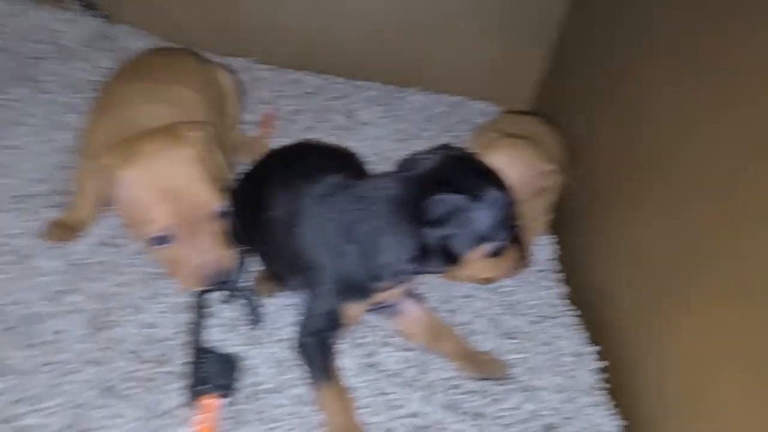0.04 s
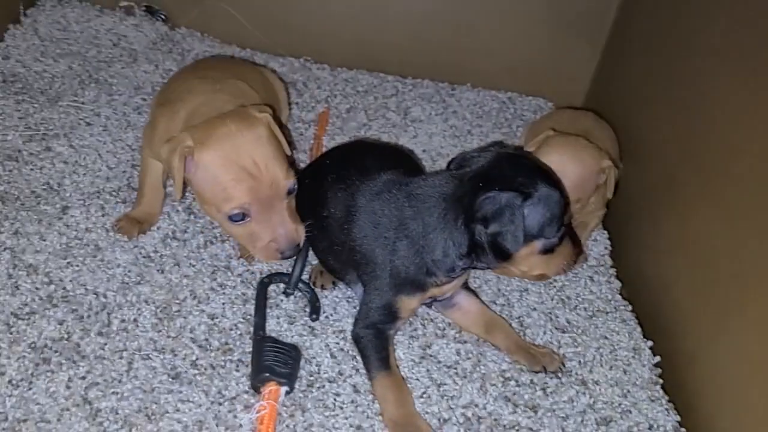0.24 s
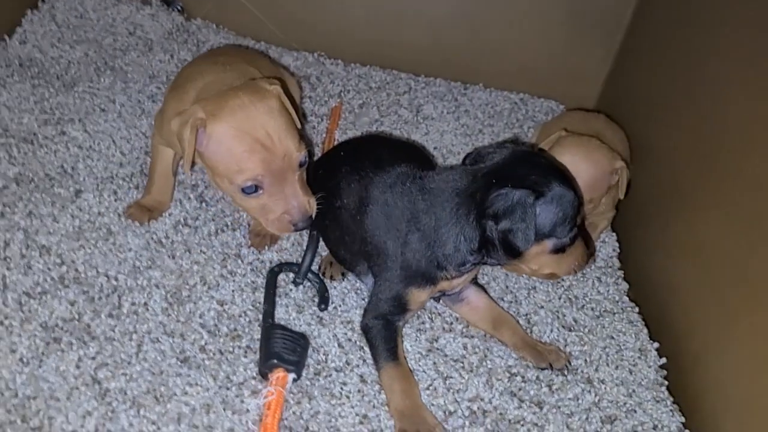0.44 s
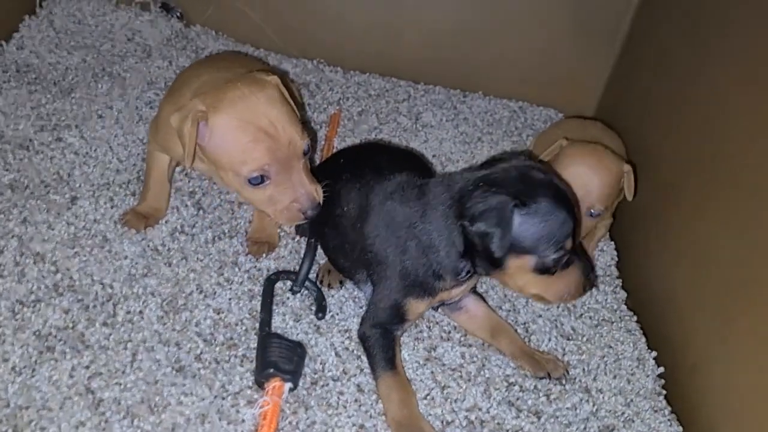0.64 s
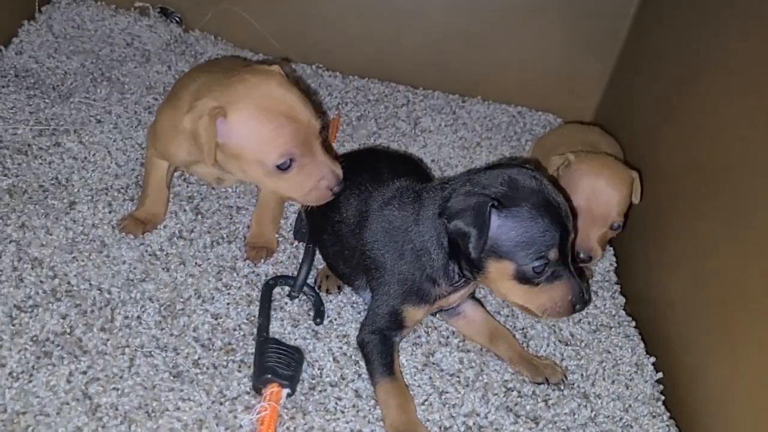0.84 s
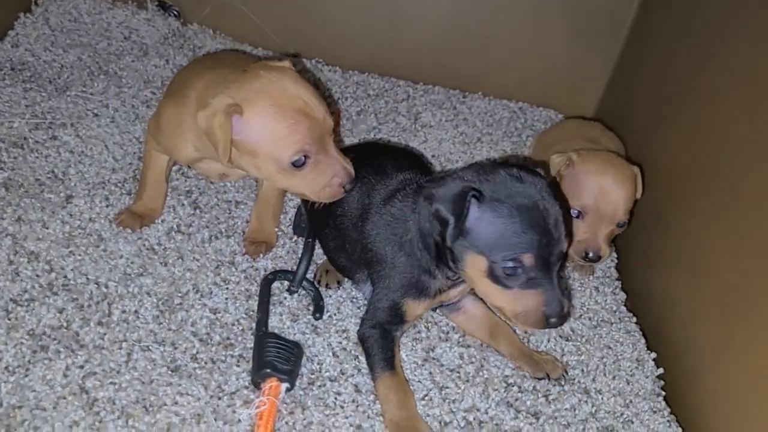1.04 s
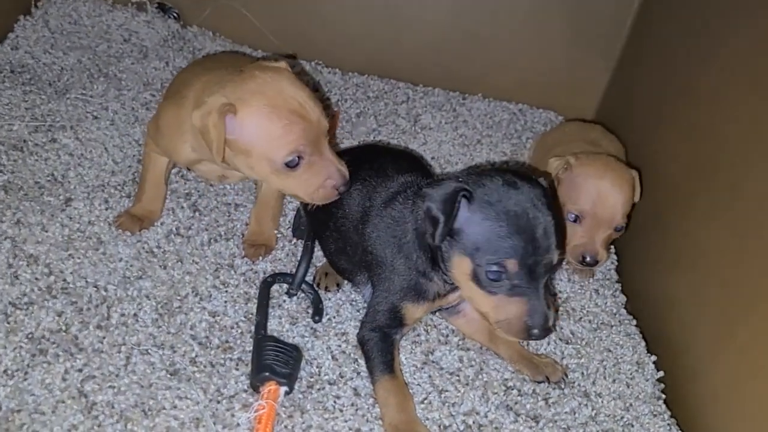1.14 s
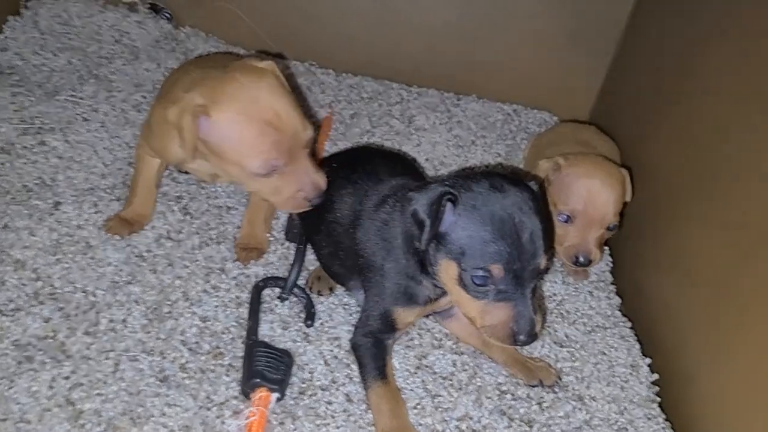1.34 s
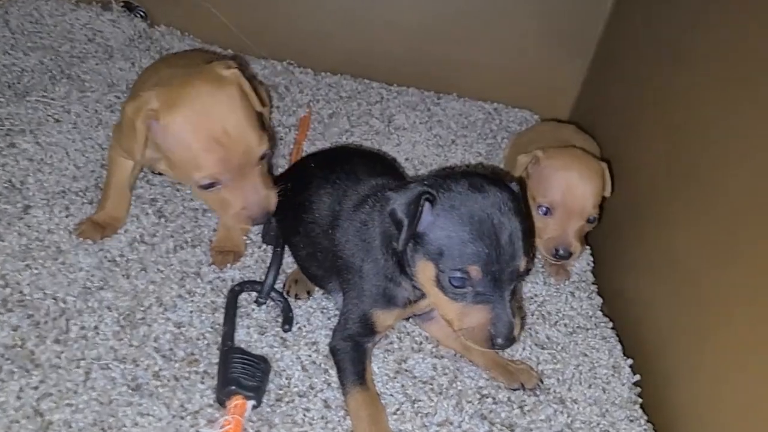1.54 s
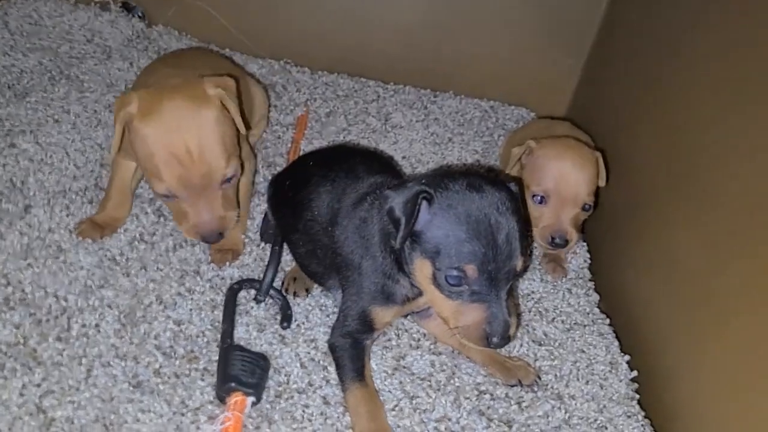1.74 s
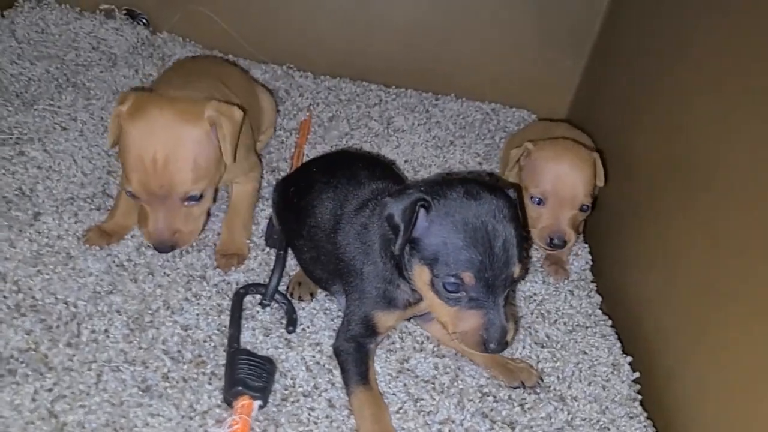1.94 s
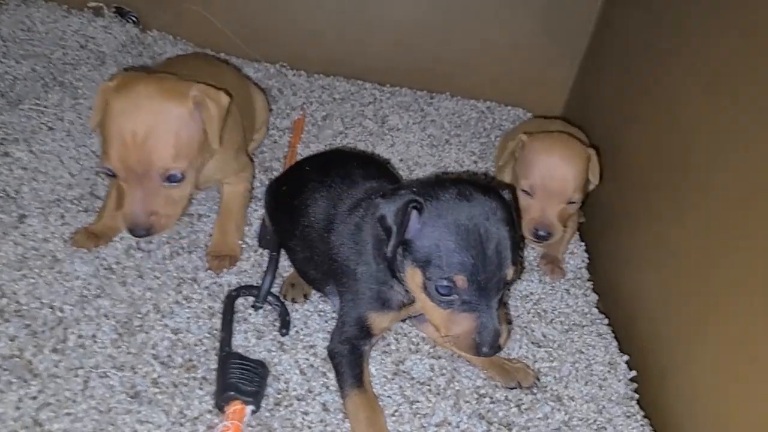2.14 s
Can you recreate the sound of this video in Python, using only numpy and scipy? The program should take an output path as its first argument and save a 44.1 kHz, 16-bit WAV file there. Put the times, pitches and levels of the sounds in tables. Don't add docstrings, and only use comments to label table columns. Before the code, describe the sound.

Young puppies cry close to a small stereo microphone. A fading cry opens, then from 0.17 s yelps and whines pile up, hoarse and raspy, densest around 0.4-0.9 s. A clear whine falls away by 1.25 s; a fresh yelp comes at 1.3 s, the sharpest, loudest at 1.6 s, then a high whine and whimper to 2 s. A new yelp starts at 2.17 s. Faint sniffs, boxy echoes, low distant hum.

```python
import sys
import numpy as np
from scipy import signal
from scipy.fft import rfft, irfft, next_fast_len
from scipy.io import wavfile
from scipy.ndimage import uniform_filter1d, minimum_filter1d, map_coordinates

SR = 44100
rng = np.random.default_rng(int(sys.argv[2]) if len(sys.argv) > 2 else 0)


def gain_from_decibels(decibels):
    exponent = np.asarray(decibels, float) / 20
    return 10 ** exponent


def persist_wave(psi):
    counts = np.round(np.clip(psi, -1, 1) * 32767).astype(np.int16)
    wavfile.write(sys.argv[1], SR, np.atleast_2d(counts).T)


N = 97020


def unit(x):
    return x / np.sqrt(np.mean(x ** 2) + 1e-20)


def along(points, hz):
    f, v = np.transpose(points)
    return np.interp(np.log(hz + 1), np.log(f + 1), v)


def wobble(rate_hz, size=N):
    values = rng.standard_normal(int(size * rate_hz / SR) + 4)
    return map_coordinates(values, [np.arange(size) * rate_hz / SR])


def filtered(x, response):
    m = next_fast_len(N + SR // 2)
    return irfft(rfft(x, m) * response(np.fft.rfftfreq(m, 1 / SR)), m)[..., :N]


def placed(x, place):
    gap_db, lag_ms = place
    side = np.array([[.5], [-.5]])
    return filtered(x, lambda hz: gain_from_decibels(side * gap_db) * np.exp(-2j * np.pi * hz * side * lag_ms / 1000))


HUM_HZ, HUM_DB, HUM_WANDER_HZ = 84.2, -43.5, 1.97
FLOOR_DB = -47.5
# freq_hz, level_db (per Hz)
FLOOR = [(25, -9), (60, 9.5), (128, 3.5), (175, -1.5), (356, -16), (760, -11), (3000, -25), (6500, -27.5),
         (7800, -41.5), (16000, -43.5)]
# freq_hz, likeness (0-1)
ALIKE = [(60, 0.84), (200, 1), (600, 0.98), (1500, 0)]


def background():
    phase = 2 * np.pi * np.cumsum(HUM_HZ + HUM_WANDER_HZ * wobble(12.07)) / SR
    hum = np.sqrt(2) * gain_from_decibels(HUM_DB + 3.3 * wobble(14.32)) * np.sin(phase)

    def spread(hz):
        angle = np.arccos(np.clip(along(ALIKE, hz), -1, 1)) / 2
        return gain_from_decibels(along(FLOOR, hz)) * [np.cos(angle), np.sin(angle)]

    mid, side = filtered(rng.standard_normal((2, N)), spread)
    floor = unit(np.array([mid + side, mid - side]))
    return gain_from_decibels([[-.9], [.9]]) * (hum + gain_from_decibels(FLOOR_DB) * floor)


EDGE_S, DRIFT = .015, .003
HOARSE_HZ, JITTER = 130, 1.1
QUAVER_DB, QUAVER_HZ = 3, 45
# freq_hz, level_db
THROAT = [(900, 12.5), (2300, 2.5), (3300, -8.5), (4100, -20.5), (5500, -28), (7500, -41.5), (11800, -30.5),
          (16000, -72.5)]


def cry(rows, second_db, loss_db, hoarse):
    s, *cols = np.transpose(rows)
    at = np.arange(max(round(s[0] * SR), 0), min(round(s[-1] * SR), N))
    t, size = at / SR, len(at)
    hz, first_db = [uniform_filter1d(np.interp(t, s, c), size=661) for c in cols]
    hz = hz * (1 + DRIFT * wobble(34.24, size=size))
    first_db = first_db + QUAVER_DB * wobble(QUAVER_HZ, size=size)
    phase = 2 * np.pi * np.cumsum(hz) / SR + JITTER * hoarse * wobble(2 * HOARSE_HZ, size=size)
    sound = np.zeros(size)
    for k in range(1, 17):
        db = first_db
        if k > 1:
            loss = loss_db * (k - 2) if k < 4 else max(loss_db * 2, loss_db * (5 - k))
            db = db + second_db - loss + along(THROAT, k * hz) - along(THROAT, 2 * hz)
        shake = wobble(2 * HOARSE_HZ, size=size) + 1j * wobble(2 * HOARSE_HZ, size=size)
        rough = min(hoarse * k ** 0.61, 1)
        flutter = np.sqrt(1 - rough) + np.sqrt(rough / 2) * shake
        level = gain_from_decibels(db + QUAVER_DB / 2 * wobble(QUAVER_HZ, size=size)) * (k * hz < 16000)
        sound += level * np.real(flutter * np.exp(1j * (k * phase + rng.uniform(0, 2 * np.pi))))
    rise = t - s[0] + (s[0] < EDGE_S)
    fall = s[-1] - t + (at[-1] > N - 99)
    out = np.zeros(N)
    out[at] = np.sqrt(2) * sound * np.clip(np.minimum(rise, fall) / EDGE_S, 0, 1)
    return out


# start_s, pitch_hz, level_db (of the fundamental)
FADING = [(0, 782, -27.5), (.045, 763, -58.5), (.13, 791, -62)]
YELP_A = [(.168, 894.5, -31), (.2, 897, -34), (.245, 955.6, -22.5), (.29, 934, -37), (.33, 900, -48.5)]
LOW_YELP = [(.185, 796, -41), (.22, 778.5, -32.5), (.26, 760.5, -36), (.31, 770, -45.5)]
WHINE_A = [(.27, 1079, -38.5), (.31, 1140, -33), (.335, 1158, -31), (.37, 1130, -27), (.41, 1114, -44.5),
           (.45, 1100, -48)]
YELP_B = [(.36, 861.8, -40.5), (.42, 768, -30), (.47, 720.8, -30), (.52, 718.4, -29.5), (.58, 736.3, -27.5),
          (.64, 696.8, -34), (.69, 682.3, -43.5), (.77, 715, -30), (.87, 687, -47.5)]
YELP_C = [(.36, 900, -31.5), (.4, 895.7, -25), (.45, 898.7, -31), (.49, 903.6, -22), (.525, 922.7, -23.5),
          (.54, 900, -31.5), (.585, 881, -18.5), (.64, 887.5, -23), (.7, 829, -25.5)]
GROAN = [(.435, 268, -40), (.455, 300, -49), (.49, 333, -49)]
LONG_WHINE = [(.48, 1060, -28.5), (.52, 1058, -30), (.575, 1061, -25), (.64, 1045, -30.5),
              (.7, 1035, -36.5), (.76, 999, -25), (.815, 1006, -24.5), (.87, 934, -34), (.95, 917, -35.5)]
WHINE_B = [(.5, 750, -37), (.53, 774.6, -36), (.558, 813.7, -24), (.62, 814.7, -29), (.66, 816.7, -36.5),
           (.7, 821, -39), (.78, 804.6, -32.5), (.88, 806, -37.5)]
WHIMPER_A = [(.61, 427.4, -47), (.67, 284.5, -48.5), (.74, 353, -51), (.8, 499, -43.5), (.86, 373, -51),
             (.92, 313.8, -41), (1.02, 322.5, -53), (1.09, 282, -62)]
WHINE_B_HALF = [(.625, 416.2, -65), (.66, 413.7, -57.5), (.7, 412.5, -49.5), (.73, 405.1, -62), (.77, 400, -56)]
CLEAR_WHINE = [(.94, 900, -31), (.98, 900.5, -31.5), (1.02, 893, -30), (1.075, 887.9, -25),
               (1.1, 887.5, -40), (1.14, 867.6, -33.5), (1.2, 859, -41), (1.25, 842, -47),
               (1.28, 810, -61.5)]
WHINE_END = [(1.16, 843, -40.5), (1.21, 802, -39.5), (1.26, 844, -52.5), (1.29, 812, -73.5)]
SWOOP = [(1.28, 382.6, -40.5), (1.31, 572.5, -44), (1.345, 773.3, -36.5), (1.39, 797, -31),
         (1.44, 814, -42)]
YELP_D = [(1.285, 1002, -43.5), (1.302, 1015, -31), (1.33, 1049, -20.5), (1.375, 1038, -35),
          (1.414, 1060, -26), (1.44, 1058, -33), (1.48, 1045, -46.5), (1.53, 1040, -60)]
WHIMPER_B = [(1.4, 513.3, -37.5), (1.44, 370.8, -55), (1.48, 346.1, -50.5), (1.54, 396.8, -48),
             (1.65, 431.6, -45.5), (1.79, 455, -50.5)]
YELP_E = [(1.565, 983, -16), (1.59, 950, -22.5), (1.62, 912.7, -7.5), (1.636, 920.4, -23.5),
          (1.652, 905.5, -11.5), (1.666, 897.7, -20.5), (1.685, 886.6, -17), (1.714, 900, -30.5),
          (1.78, 887, -52.5)]
RISING = [(1.65, 993.5, -37), (1.69, 999.5, -26), (1.75, 1038, -40), (1.8, 1052, -38)]
WHIMPER_C = [(1.79, 326, -48.5), (1.835, 393, -35), (1.86, 500, -37.5), (1.885, 599, -27.5),
             (1.91, 636.5, -30), (1.945, 584, -30.5), (1.97, 452, -40), (2, 300, -51)]
WHINE_C = [(1.8, 1048, -37), (1.82, 1046, -19), (1.85, 1075, -26.5), (1.882, 1134, -24), (1.9, 1114, -24),
           (1.914, 1126, -40), (1.942, 1165, -34), (2, 1170, -52), (2.07, 1147, -59)]
CROAKING = [(1.8, 961, -47), (1.83, 940, -39.5), (1.87, 900, -41.5), (1.92, 859, -48.5)]
CHIRP = [(1.97, 627, -51), (2.02, 676, -41), (2.09, 692, -85)]
NEXT_YELP = [(2.172, 994, -47.5), (2.2, 937, -35)]
CLEAR, HUSKY, HOARSE, RAGGED = .05, .15, .33, .7
# left_over_right_db, left_lag_ms
NEAR, MIDDLE, FAR = (-1.3, -0.26), (-.6, -0.21), (.3, -0.078)
# path, second_db (second partial over first), loss_db (per higher partial),
# hoarseness (0-1), place
CRIES = [(FADING, 0, -8, HUSKY, MIDDLE), (YELP_A, 5.1, 7.3, RAGGED, NEAR),
         (WHINE_A, 4.7, 42, HUSKY, MIDDLE), (YELP_B, 2.8, 3, HOARSE, FAR), (YELP_C, 0.17, 27, HUSKY, NEAR),
         (WHINE_B, -6.5, -7.5, HUSKY, FAR), (WHINE_B_HALF, 24.4, -8.5, CLEAR, FAR),
         (LONG_WHINE, 4.1, 48, HOARSE, MIDDLE), (CLEAR_WHINE, 2.7, 6.6, CLEAR, MIDDLE),
         (WHINE_END, 8, 6, CLEAR, MIDDLE), (WHIMPER_A, 1.9, 2.8, CLEAR, FAR),
         (SWOOP, 0.024, -9, HUSKY, FAR), (YELP_D, 0.73, 3.2, RAGGED, NEAR),
         (WHIMPER_B, 9.5, 11, CLEAR, FAR), (YELP_E, -6.5, 1.36, HUSKY, NEAR),
         (WHINE_C, -0.79, 7.2, HUSKY, MIDDLE), (WHIMPER_C, -5, 1, HUSKY, FAR),
         (CHIRP, -40, 1.9, CLEAR, FAR), (NEXT_YELP, 3.3, 5.4, HUSKY, NEAR),
         (LOW_YELP, -6.5, -10, HOARSE, FAR), (RISING, 6, 5.1, HOARSE, MIDDLE),
         (CROAKING, 9.7, 6.2, RAGGED, NEAR), (GROAN, -3, 4.4, RAGGED, FAR)]


def puppies():
    return [(cry(*voice), place) for *voice, place in CRIES]


RASP_HZ, RASP_SCATTER, RASP_SIZE_DB = 237.7, .45, 3.5
RASP_DB, BREATH = -3, .5
RASP_LOW_HZ, RASP_TOP_HZ = 654, 3200
AIR_DB, AIR_TOP_HZ = -10.5, 13100
LEFT, RIGHT = (5, .1), (-6, -.4)
# start_s, level_db
STRAIN = [(0, -36), (0.141, -71.5), (0.169, -52), (0.232, -32), (.34, -48), (0.465, -33), (.49, -19),
          (0.6, -23), (0.8, -31), (1.05, -38), (1.11, -64), (1.285, -55.5), (1.315, -25), (1.439, -31),
          (1.56, -52), (1.59, -22), (1.78, -40), (1.84, -32), (2.049, -64)]
# freq_hz, width_hz, level_db
RASP_TRACT = [(860, 340, 5), (1640, 786, 4.5), (2048, 428, 6.5), (3280, 810, -12), (5600, 1000, -16),
              (9200, 630, -31.5), (11600, 770, -31.5)]


def rasp():
    s, db = np.transpose(STRAIN)
    beat = np.cumsum(RASP_HZ * np.exp(RASP_SCATTER * wobble(RASP_HZ))) / SR
    opening = np.diff(np.floor(beat), prepend=0) > 0
    pulses = unit(opening * gain_from_decibels(RASP_SIZE_DB * wobble(RASP_HZ)))
    breath = unit(rng.standard_normal(N) * np.exp(-2 * (beat % 1)))
    source = np.sqrt(1 - BREATH) * pulses + np.sqrt(BREATH) * breath

    def tract(f):
        low = (1j * f / RASP_LOW_HZ / (1 + 1j * f / RASP_LOW_HZ)) ** 4
        air = gain_from_decibels(AIR_DB) / (1 + (f / AIR_TOP_HZ) ** 8)
        body = 1 / (1 + (f / RASP_TOP_HZ) ** 6)
        rings = sum((-1) ** k * gain_from_decibels(g) * 1j * f * w / (c * c - f * f + 1j * f * w)
                    for k, (c, w, g) in enumerate(RASP_TRACT))
        return low * (air + body) * rings

    return unit(filtered(source, tract)) * gain_from_decibels(np.interp(np.arange(N) / SR, s, db) + RASP_DB)


NOSE_HZ, NOSE_WIDE_HZ = 5350, 900
# middle_s, length_s, level_db
SNIFFS = [
    (0.029, 0.19, -53.5),
    (0.255, 0.17, -58.5),
    (0.402, 0.096, -55.5),
    (0.862, 0.067, -45.5),
    (1.4, .15, -51.5),
    (1.656, 0.13, -55),
    (1.78, 0.18, -50),
    (1.942, .14, -57),
]


def sniffs():
    t = np.arange(N) / SR
    puffs = sum(gain_from_decibels(db) * np.exp(-((t - s) / length * 2) ** 2) for s, length, db in SNIFFS)
    air = filtered(rng.standard_normal((2, N)), lambda f: np.exp(-((f - NOSE_HZ) / NOSE_WIDE_HZ) ** 2))
    return unit(air) * puffs * gain_from_decibels(2.4 * wobble(35))


ROOM_DB, WALL_DB, WALL_S = -2.5, -8, .012
ROOM_WIDE_HZ = 300
# freq_hz, t60_s
ROOM = [(300, 0.067), (2000, 0.32), (8000, 0.11)]


def room(x):
    hz, t, z = signal.stft(rng.standard_normal((2, SR // 2)), SR, nperseg=256)
    tail = signal.istft(z * gain_from_decibels(-60 * t / along(ROOM, hz)[:, None]), SR, nperseg=256)[1]
    answer = gain_from_decibels(ROOM_DB) * np.pad(tail / np.linalg.norm(tail[0]), ((0, 0), (300, 0)))
    for port in answer:
        echo_at = (rng.uniform(.1, 1, size=6) * WALL_S * SR).astype(int)
        port[echo_at] += gain_from_decibels(WALL_DB) * rng.choice([-1, 1], size=6)
    left, right = signal.fftconvolve(x[None], answer, axes=1)[:, :N]
    side = filtered((left - right) / 2, lambda hz: 1 / (1 + (ROOM_WIDE_HZ / (hz + 1)) ** 2))
    return (left + right) / 2 + np.array([side, -side])


# freq_hz, level_db (left up and right down by this much)
MIC_TILT = [(100, -.8), (600, -.6), (2500, -1), (5000, -2.5), (15000, -2.5)]


def microphones(heard):
    return filtered(heard, lambda hz: gain_from_decibels(along(MIC_TILT, hz) * np.array([[1], [-1]])))


def scene():
    voices = puppies() + [(rasp(), LEFT), (rasp(), RIGHT)]
    direct = sum(placed(x, place) for x, place in voices)
    echoes = room(sum(x for x, place in voices))
    return microphones(direct + sniffs() + echoes) + background()


def low_pass(x):
    return signal.sosfilt(signal.butter(12, 15800, fs=SR, output="sos"), x)


def record(dry):
    need = np.minimum(1, 1.01 / (np.abs(dry).max(axis=0) + 1e-9))
    gain = uniform_filter1d(minimum_filter1d(need, size=441), size=441)
    return low_pass(np.clip(dry * gain, -1, 1))


dry = scene()
out = record(dry)
persist_wave(out)
```